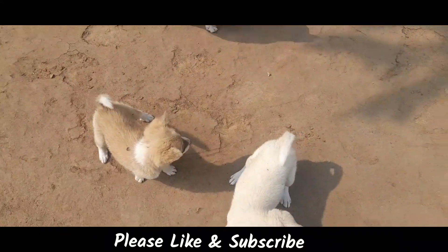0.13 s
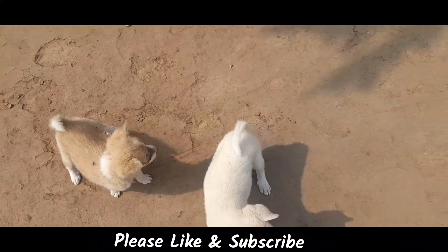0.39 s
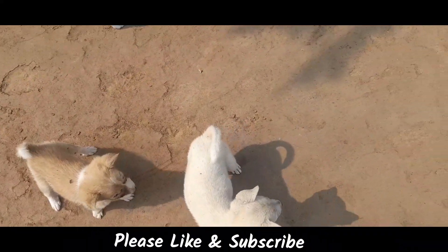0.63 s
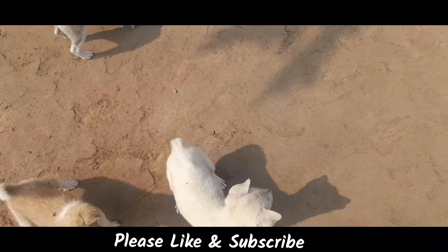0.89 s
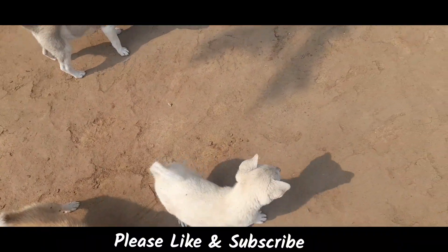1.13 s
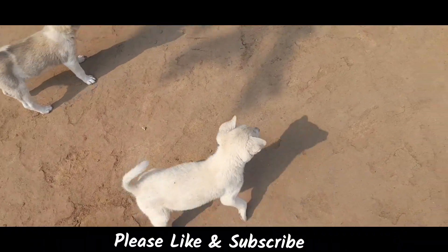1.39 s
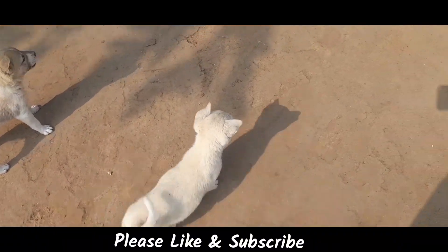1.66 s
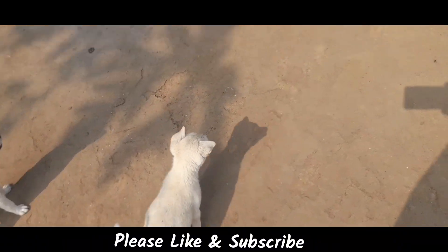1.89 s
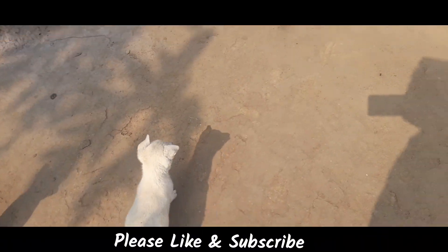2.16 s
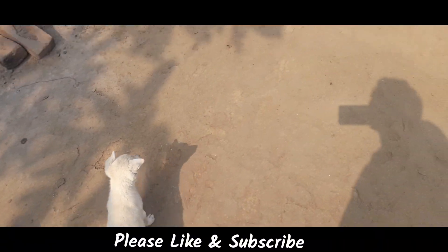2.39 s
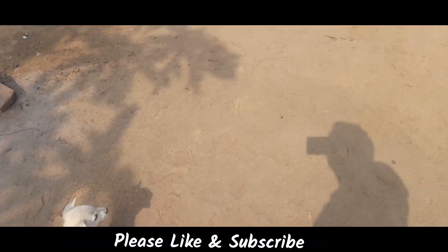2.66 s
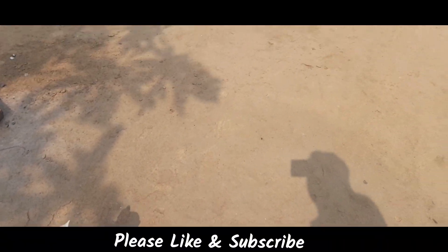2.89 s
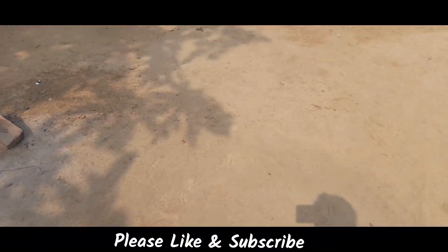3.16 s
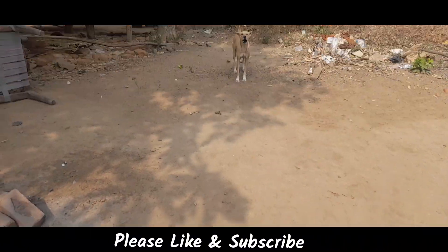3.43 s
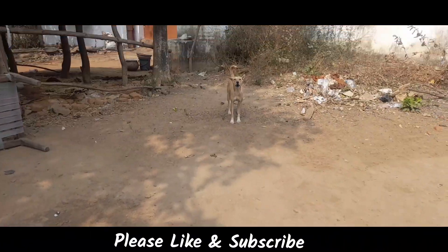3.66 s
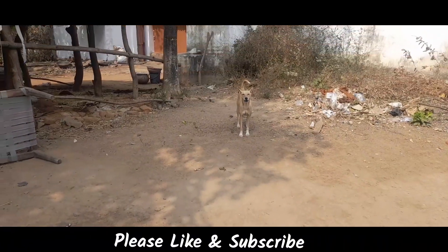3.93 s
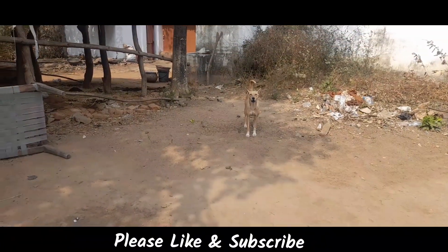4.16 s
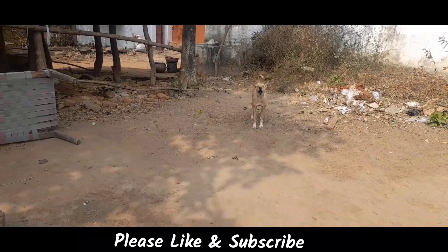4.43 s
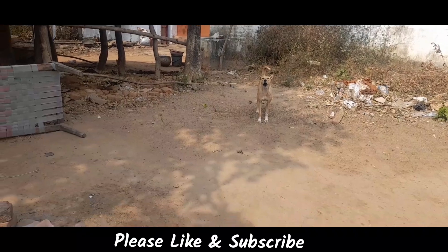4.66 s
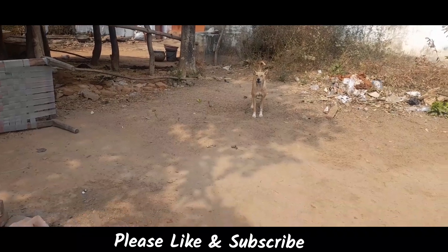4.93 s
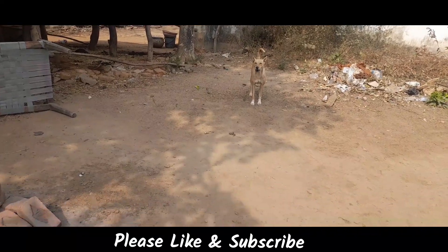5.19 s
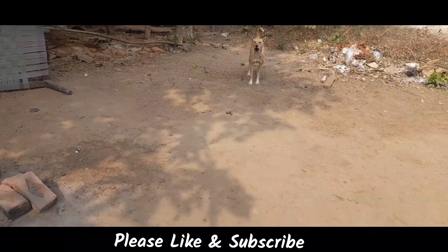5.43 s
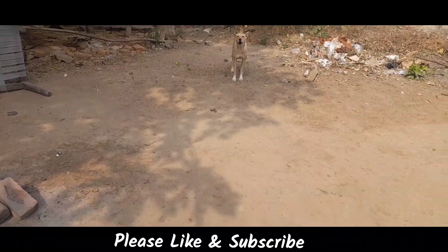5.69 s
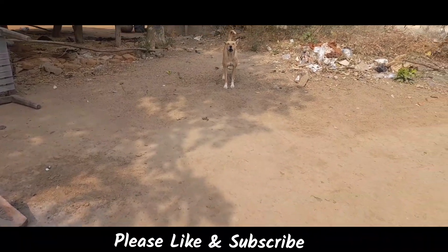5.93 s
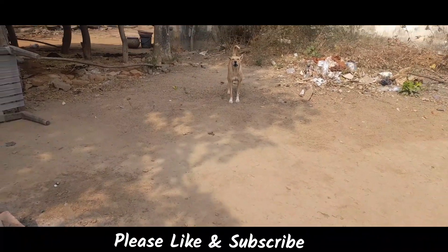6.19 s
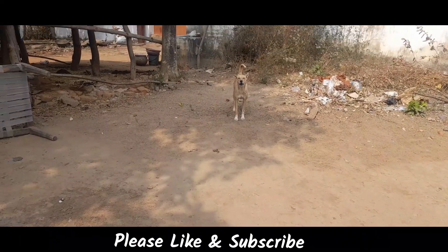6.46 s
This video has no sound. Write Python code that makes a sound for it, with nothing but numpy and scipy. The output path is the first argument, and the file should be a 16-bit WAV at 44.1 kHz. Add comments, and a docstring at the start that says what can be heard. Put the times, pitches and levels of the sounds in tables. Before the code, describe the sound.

A quiet dirt yard with low wind, far traffic and soft puppy grunts; a small tick, faint bird chirps. Then a dog some metres off bursts into hoarse barks sliding into a long wavering howl. A puppy gives a thin high yelp midway. The howl sinks away, a short near-silence follows, and a second, more broken howl runs to the end. Hand-held stereo microphone turning slowly, with short echoes from walls.

```python
"""A dog some metres off howls in a dirt yard: hoarse barks that slide into long wavering notes,
made of vocal-fold partials weighted by the resonances of throat, mouth and head.
A puppy yelps once in four partials; grunts, chirps and a far bark are short gliding notes.
Filtered noise gives the wind, far traffic and yard hiss; a noise burst gives a pebble's tick.
The hand-held microphone pair turns slowly, so the dog's level and arrival time drift between the sides."""
import sys
import numpy as np
from scipy import signal
from scipy.fft import rfft, irfft
from scipy.io import wavfile
from scipy.ndimage import uniform_filter1d, map_coordinates

SR = 44100
rng = np.random.default_rng(int(sys.argv[2]) if len(sys.argv) > 2 else 0)


def level_to_linear(level):
    """Convert decibel levels to linear amplitude factors, elementwise."""
    exponent = np.asarray(level, float) / 20
    return 10 ** exponent


def dump_mix(stems):
    """Bounce the given channels to the path in sys.argv[1] as a 16-bit WAV at rate SR."""
    frames = np.atleast_2d(stems).T  # one column per channel
    limited = np.clip(frames, -1, 1)  # hard clip at full scale
    pcm = np.round(limited * 32767).astype(np.int16)
    wavfile.write(sys.argv[1], SR, pcm)


N = 289737


def rms_one(x):
    """Normalisation: divides a signal by its root mean square."""
    return x / np.sqrt(np.mean(x ** 2) + 1e-20)


def in_time(rows):
    """Linear interpolation: each column after the first as a curve over the whole scene."""
    s, *columns = np.transpose(rows)
    return [np.interp(np.arange(N) / SR, s, c) for c in columns]


def at_hz(points, hz):
    """Spectrum interpolation: level in dB is linear in log frequency between the points."""
    point_hz, point_db = np.transpose(points)
    return np.interp(np.log(hz), np.log(point_hz), point_db)


def slow_noise(hz, count):
    """Band limitation: white noise low-passed at hz wanders slowly; rms 1."""
    low_pass = signal.butter(4, hz, fs=SR, output="sos")
    settle = 9000    # samples dropped while the filter starts up
    return rms_one(signal.sosfilt(low_pass, rng.standard_normal(count + settle))[settle:])


def coloured(spectrum, alike, flicker_db):
    """Filtered noise: two sides of correlation alike share a spectrum and a level flutter; rms 1."""
    mid, side = rng.standard_normal((2, N))
    pair = mid + np.sqrt((1 - alike) / (1 + alike)) * side * np.array([[1], [-1]])
    hz = np.maximum(np.fft.rfftfreq(N, 1 / SR), 1)
    noise = irfft(rfft(pair) * level_to_linear(at_hz(spectrum, hz)), N)
    return rms_one(noise * level_to_linear(flicker_db * slow_noise(4.8, N)))


def rumble():
    """Broadband noise: wind and far traffic, mostly low and nearly alike on both sides."""
    # course of the level: time_s, level_db
    course = [(0, -43.5), (.77, -53.5), (1.26, -43.5), (1.52, -52), (3.9, -59.5), (4.15, -67), (4.5, -63.5),
              (5.1, -58.5), (5.9, -53.5), (6.57, -49)]
    # relative spectral density: frequency_hz, density_db (per Hz)
    colour = [(15, -56.5), (25, -32), (88, 1), (151, -9), (223, -11), (330, -18.5), (419, -30.5),
              (557, -59), (900, -41.5), (1170, -93), (1980, -120)]
    return level_to_linear(in_time(course)[0]) * coloured(colour, alike=0.92, flicker_db=0.5)


def hiss():
    """Broadband noise: yard hiss and paws in the dust, wider than the rumble."""
    # course of the level: time_s, level_db
    course = [(0, -62), (.68, -63), (.74, -53.5), (.9, -57), (1.24, -53), (1.5, -46.5), (4.1, -71),
              (6.57, -52)]
    # relative spectral density: frequency_hz, density_db (per Hz)
    colour = [(260, -26.5), (450, 1.5), (702, -11.5), (814, -2), (1130, -10.5), (1430, -1.5), (5030, -16),
              (5750, -19.5), (15500, -22)]
    return level_to_linear(in_time(course)[0]) * coloured(colour, alike=.45, flicker_db=1.2)


def add_note(out, s, length, start_hz, end_hz, db, partial_db, rough):
    """Harmonic synthesis: a gliding note under a half-sine swell, its partials roughened by noise."""
    t = np.arange(int(length * SR)) / SR
    pitch = start_hz + (end_hz - start_hz) * t / length
    phase = 2 * np.pi * np.cumsum(pitch) / SR
    tone = 0
    for k, p in enumerate(partial_db, start=1):
        tone = tone + level_to_linear(p) * np.sin(k * phase) * (1 + rough * slow_noise(110, len(t)))
    start = int(s * SR)
    out[start:start + len(t)] += np.sqrt(2) * level_to_linear(db) * np.sin(np.pi * t / length) * tone


def grunts():
    """Amplitude modulation: puppies' low notes of four partials, each roughened by noise."""
    # grunts, level before roughness: start_s, length_s, start_hz, end_hz, level_db,
    # second_db (second partial against the first)
    rows = [(0, 0.096, 155, 130, -37, -5.5), (0.776, 0.14, 128.6, 122.4, -40.5, -8.5),
            (0.855, 0.08, 132, 123.4, -39, -16.5), (2.158, 0.084, 157.4, 125, -38.5, -22),
            (2.492, 0.067, 228.4, 228, -40.5, -17), (3.511, 0.087, 153, 140.3, -71, -11.5)]
    out = np.zeros(N)
    for *note, second_db in rows:
        partial_db = [0, second_db, second_db - 10.5, second_db - 11.5]
        add_note(out, *note, partial_db, rough=0.57)
    return out


def chirps():
    """Amplitude modulation: single gliding partials, strongly roughened, as birds."""
    # chirps, level before roughness: start_s, length_s, start_hz, end_hz, level_db
    rows = [(0.213, 0.14, 7260, 3900, -84.5), (0.9, 0.11, 5100, 5050, -71.5),
            (0.958, 0.081, 4400, 4140, -70.5), (1.154, 0.087, 6700, 6700, -67),
            (1.168, 0.17, 6350, 4900, -67.5), (4.26, 0.037, 3450, 3340, -78),
            (4.406, 0.037, 3280, 3200, -82.5), (6.024, 0.1, 6800, 5000, -69)]
    out = np.zeros(N)
    for row in rows:
        add_note(out, *row, [0], rough=4)
    return out


def pebble_tick():
    """Impulsive excitation: a differenced noise burst that dies away exponentially."""
    # ticks: start_s, level_db (scale of the noise before differencing)
    rows = [(0.7068, -44.5)]
    out = np.zeros(N)
    for s, db in rows:
        burst = np.diff(rng.standard_normal(101)) * np.exp(-np.arange(100) / 25)
        out[int(s * SR):int(s * SR) + 100] += level_to_linear(db) * burst
    return out


def peak(hz, centre_hz, width_hz, db):
    """Resonance: power response of a peak applied three times, with dark valleys; 1/8 at width_hz off centre."""
    return level_to_linear(2 * db) / (1 + ((hz - centre_hz) / width_hz) ** 2) ** 3


def through(rows, t):
    """Cubic Hermite interpolation: a smooth curve through the rows, flat where the direction reverses."""
    s, *columns = np.transpose(rows)
    i = np.clip(np.searchsorted(s, t) - 1, 0, len(s) - 2)
    step = np.diff(s)[i]
    u = (t - s[i]) / step
    curves = []
    for c in columns:
        rise = np.diff(c) / np.diff(s)
        both = np.maximum(rise[1:] * rise[:-1], 0)
        # harmonic mean of the neighbouring slopes
        slope = np.r_[rise[0], 2 * both / (rise[1:] + rise[:-1] + 1e-9), rise[-1]]
        ease = (c[i + 1] - c[i]) * u * u * (3 - 2 * u)
        bend = step * u * (1 - u) * ((1 - u) * slope[i] - u * slope[i + 1])
        curves.append(c[i] + ease + bend)
    return curves


def throat_and_mouth(hz, throat, mouth, mouth_db):
    """Formants: throat and mouth each ring with a sharp tip on a broad base, beside a chest resonance."""
    # chest resonance: centre_hz, width_hz, level_db (against the throat)
    chest = (155, 55, 4)
    base_hz, tip_hz = 348, 98
    throat_tip_db, mouth_tip_db = 5.5, 9.5
    # the throat's broad base passes little below 440 Hz
    low = peak(hz, throat, base_hz, 0) / (1 + (440 / hz) ** 8)
    low += peak(hz, *chest)
    low += peak(hz, mouth, base_hz, mouth_db)
    low += peak(hz, throat, tip_hz, throat_tip_db)
    low += peak(hz, mouth, tip_hz, mouth_db + mouth_tip_db)
    # little passes above 1.34 times the mouth resonance
    return low / (1 + (hz / (1.34 * mouth)) ** 12)


def roughness(pitch, t):
    """Irregular phonation: a held note is nearly clear, fast glides and hoarse stretches rasp."""
    # hoarse stretches: start_s, length_s, added_roughness (0-1)
    hoarse = [(1.24, .235, .13), (1.475, .065, .06), (1.54, .07, .12), (1.9, .17, .04), (3.2, .55, .012),
              (3.75, .18, .06), (3.93, .14, .4), (4.5, .05, .4), (4.55, .18, .18), (4.73, .36, .02),
              (5.09, .26, .2), (5.45, .11, .08), (5.56, 1.1, .012)]
    clear, per_octave_per_s = .012, .005
    glide = np.abs(np.gradient(np.log2(pitch))) * SR    # octaves per second
    rough = clear + per_octave_per_s * glide
    for s, length, added in hoarse:
        rough = rough + added * (t > s) * (t < s + length)
    return np.clip(uniform_filter1d(rough, size=700), 0, 1)


def howl(rows, jitter, smear_hz, wander_db):
    """Source-filter principle: each vocal-fold partial is weighted by the resonances at its own frequency."""
    # slow shape of the open jaw before the push of breath, levels against the throat:
    # time_s, throat_hz, mouth_hz, mouth_db, treble_db
    jaw = [(1.25, 650, 1534, -5.5, -21), (1.33, 671, 1570, -7, -16), (1.42, 747, 1457, -1, -18.5),
           (1.5, 676, 1574, -9.5, -18.5), (1.62, 704, 1413, 2.5, -13), (1.85, 912, 1441, -7.5, -18),
           (1.95, 756, 1476, -12.5, -16), (2.1, 774, 1576, -7.5, -18.5), (2.3, 707, 1409, -20, -29.5),
           (2.55, 838, 1347, -10, -17.5), (2.9, 833, 1181, -2, -13), (3.15, 883, 1273, -1, -14),
           (3.3, 900, 1262, -11.5, -28), (3.45, 912, 1333, -11.5, -20.5), (3.65, 911, 1357, -7, -19),
           (3.78, 865, 1242, -10, -24.5), (3.81, 565.6, 1036, -0.5, -20.5), (3.89, 840, 1154, -17.5, -32),
           (3.95, 650, 1041, -9.5, -27), (4.55, 707.4, 1061, 5.5, -17), (4.6, 690, 1136, -2, -20),
           (4.7, 750, 1093, -5, -26), (4.85, 814, 1205, -8.5, -24), (5.03, 845, 1236, -14.5, -30),
           (5.18, 566, 1065, -22.5, -36), (5.3, 703, 1000, -10, -48), (5.4, 842, 1204, -0.5, -17),
           (5.51, 540, 1113, 4, -10), (5.6, 646.5, 1149, 13, -10), (5.8, 756, 1054, 6, -19.5),
           (6.0, 964, 1302, -10.5, -23), (6.2, 955, 1364, -12, -24.5), (6.35, 884, 1329, -15.5, -25.5),
           (6.42, 604.4, 1233, -1, -19.5), (6.5, 917, 1250, -16.5, -30.5), (6.57, 705.6, 1245, 4, -16.5)]
    # bite, a drifting resonance: time_s, centre_hz, level_db (above the treble)
    bite_course = [(1.25, 2620, 5.5), (1.6, 2320, 9), (2.2, 2210, -4.5), (3.1, 2163, -4), (3.9, 2283, 7.5),
                   (4.6, 2390, 4), (5.0, 2460, 10.5), (5.4, 2610, 3.5), (5.8, 2340, 7), (6.57, 2410, 7.5)]
    # upper resonances of the head: centre_hz, width_hz, level_db (against the treble)
    head_modes = [(3200, 150, -8), (3770, 360, -8.5), (4900, 2600, -30), (5580, 150, -26.5),
                  (6700, 200, -28), (7350, 350, -30.5), (10070, 1200, -36), (11930, 790, -31),
                  (14300, 1500, -37)]
    # a side cavity swallows a narrow band: centre_hz, width_hz, share_db (of the power removed)
    sinus = (2880, 220, -.3)
    a, b = int(rows[0][0] * SR), min(int(rows[-1][0] * SR), N)
    t, mean_size = np.arange(a, b) / SR, int(0.28 * SR)
    pitch, level_db = through(rows, t)

    # each push of breath lifts the pitch over its local mean and opens the jaw; factors per octave of lift
    lift = np.log2(pitch) - uniform_filter1d(np.log2(pitch), size=mean_size)
    throat, mouth, mouth_db, treble_db = [c[a:b] for c in in_time(jaw)]
    throat = throat * 2 ** (.15 * lift)
    mouth = mouth * 2 ** (0.021 * lift)
    mouth_db = mouth_db + 12 * lift
    treble_db = treble_db + 13 * lift

    rough = roughness(pitch, t)
    phase = 2 * np.pi * np.cumsum(pitch * (1 + jitter * rough * slow_noise(57, b - a))) / SR
    sway = [slow_noise(smear_hz, b - a) for _ in range(6)]
    # weak upper partials come and go
    wander = [level_to_linear(wander_db * slow_noise(7.53, b - a)) for _ in range(7)]
    grid = np.arange(0, SR, 20)
    head = sum(peak(grid, *mode) for mode in head_modes)
    bite_hz, bite_db = [c[a:b] for c in in_time(bite_course)]
    voice, total = 0, 0
    for k in range(1, 46):
        hz = k * pitch
        low = throat_and_mouth(hz, throat, mouth, mouth_db)
        total = total + low
        high = np.interp(hz, grid, head) + peak(hz, bite_hz, 220, bite_db)
        high = high * level_to_linear(2 * treble_db) * wander[k % 7] ** 2
        power = low + high * (1 - np.minimum(peak(hz, *sinus), .97))
        # high partials blur first: the noise share grows above about 1100 Hz
        share = np.minimum(rough * (1 + (hz / 1100) ** 2), 1)
        # irregular fold cycles smear each partial into noise around it
        clean = np.sin(k * phase + k * k / 9)
        smeared = sway[k % 6] * np.sin(k * phase) + sway[(k + 3) % 6] * np.cos(k * phase)
        voice = voice + np.sqrt(2 * power) * (np.sqrt(1 - share ** 2) * clean + share * smeared)

    # the dog holds back part of the swell as a partial crosses a resonance
    evened = 0.47
    total_db = 10 * np.log10(total)
    even_db = evened * total_db + (1 - evened) * uniform_filter1d(total_db, size=mean_size)
    out = np.zeros(N)
    out[a:b] = voice * level_to_linear(level_db - even_db) * signal.windows.tukey(b - a, 600 / (b - a))
    high_pass = signal.butter(4, 120, "high", fs=SR, output="sos")
    return signal.sosfilt(high_pass, out + 1e-18)


def howling_dog():
    """Superposition: the dog's howls, one after the other."""
    # each howl through its turning points: time_s, pitch_hz, level_db (before the swell is evened)
    howls = [
        [(1.247, 254, -42), (1.272, 392.5, -15.5), (1.315, 540.6, -11.5), (1.342, 602.4, -13.5),
         (1.362, 417, -14.5), (1.412, 299, -17), (1.44, 392.6, -20), (1.465, 501, -14), (1.478, 327.6, -11.5),
         (1.505, 328.8, -8.5), (1.56, 367, -20.5), (1.601, 377, -23.5), (1.631, 461.5, -19.5),
         (1.721, 421.8, -23.5), (1.791, 470.2, -18.5), (1.886, 481.3, -16), (1.897, 512, -17.5),
         (2.07, 501.2, -19.5), (2.155, 526, -15.5), (2.163, 584, -13), (2.3, 559.6, -18), (2.549, 527.4, -20.5),
         (2.569, 443.4, -16.5), (2.604, 442.1, -19.5), (2.75, 426.5, -20), (2.98, 412.4, -18),
         (3.088, 354.4, -25.5), (3.15, 360.7, -26), (3.205, 310.4, -18.5), (3.233, 280.2, -21.5),
         (3.283, 315.6, -19.5), (3.302, 406.5, -14), (3.338, 472, -12), (3.377, 433.8, -15),
         (3.392, 350.4, -20), (3.432, 292.4, -17.5), (3.487, 357.5, -21.5), (3.53, 425, -14.5),
         (3.577, 401.6, -18.5), (3.597, 351, -18), (3.622, 345.5, -15), (3.662, 356.7, -19),
         (3.697, 412.3, -19), (3.741, 319, -17.5), (3.776, 252.9, -24), (3.8, 240.4, -23), (3.885, 298, -23.5),
         (3.976, 165.7, -34.5), (4.001, 129.2, -47.5), (4.056, 114.8, -68)],
        [(4.508, 238, -43.5), (4.525, 280.6, -24), (4.555, 337.8, -10.5), (4.58, 340.3, -8.5),
         (4.645, 325.8, -14.5), (4.7, 321.4, -22.5), (4.73, 217, -30), (4.774, 323, -20.5), (4.824, 418, -18.5),
         (4.884, 268.9, -18.5), (4.93, 222.9, -26.5), (4.99, 286.4, -23.5), (5.024, 321.3, -19),
         (5.05, 286, -25), (5.103, 205.8, -30), (5.17, 176, -44), (5.248, 149.6, -53.5), (5.318, 143.1, -52.5),
         (5.348, 250.2, -26), (5.385, 444.8, -14), (5.413, 483, -15), (5.438, 421, -17.5), (5.473, 258.2, -22),
         (5.5, 208, -28), (5.547, 319.8, -24.5), (5.572, 430.7, -16), (5.617, 526.3, -17), (5.662, 332, -15.5),
         (5.702, 259.4, -19), (5.755, 338.4, -18), (5.782, 349, -18), (5.85, 291.9, -20.5), (5.875, 269.8, -24),
         (5.927, 353.1, -19.5), (5.966, 381.8, -13.5), (6.0, 353, -14.5), (6.07, 298.5, -18.5),
         (6.146, 354.1, -16.5), (6.191, 329.2, -16.5), (6.245, 292.2, -19), (6.316, 319.5, -18),
         (6.34, 315.2, -20), (6.41, 229.8, -25.5), (6.5, 310.6, -21), (6.565, 255.3, -27)],
    ]
    return sum(howl(rows, jitter=.1, smear_hz=170, wander_db=4.5) for rows in howls)


def yelp():
    """Additive synthesis: a puppy's thin, high voice of four partials, roughened by noise."""
    # yelp, levels before roughness: time_s, pitch_hz, first_db, second_db, third_db, fourth_db
    rows = [(2.47, 1334, -27, -63, -59, -49), (2.505, 1335, -33.5, -40, -41.5, -30),
            (2.52, 1430, -24.5, -37, -38.5, -41), (2.57, 1365, -50.5, -43.5, -38, -39),
            (2.635, 1378, -55, -27.5, -33, -29.5), (2.65, 1475, -30, -25, -36, -48),
            (2.71, 1507, -25, -46, -49, -47)]
    pitch, *levels = in_time(rows)
    phase = 2 * np.pi * np.cumsum(pitch) / SR
    start, end = rows[0][0], rows[-1][0]
    gate, = in_time([(start, 0), (start + 0.025, 1), (end - .02, 1), (end, 0)])
    tone = 0
    for k, db in enumerate(levels, start=1):
        tone = tone + np.sqrt(2) * level_to_linear(db) * np.sin(k * phase) * (1 + 0.32 * slow_noise(110, N))
    return gate * tone


def far_bark():
    """Amplitude modulation: one faint falling note of four partials, strongly roughened."""
    # bark, level before roughness: start_s, length_s, start_hz, end_hz, level_db
    row = (4.255, .15, 300, 270, -65)
    out = np.zeros(N)
    add_note(out, *row, [-3, -14, 0, -3], rough=2.5)
    return out


def placed(x):
    """Interaural-type cues: level and arrival time differ between the ports as they turn."""
    # level difference: time_s, left_minus_right_db
    pan = [(1.24, -0.5), (1.75, -5.5), (2.25, -1), (2.75, -10.5), (3.3, -5), (4.5, -2.5), (5.75, -2.5),
           (6.57, -6)]
    # arrival difference below the shading frequency: time_s, left_lag_ms
    lag = [(1.2, 0.19), (1.75, 0.18), (2.25, 0.1), (2.75, 0.022), (3.25, -0.19), (6.5, -0.17)]
    # extra level on the left port: frequency_hz, extra_db
    left_treble = [(2400, -0.5), (4400, 2), (8100, 21), (15000, -17.5)]
    shade_hz, shaded_lag = 1960, 0.43    # above this the housing shortens the lag to this share
    (pan_db,), (lag_ms,) = in_time(pan), in_time(lag)
    hz = np.maximum(np.fft.rfftfreq(N, 1 / SR), 1)
    low = irfft(rfft(x) / (1 + (hz / shade_hz) ** 8), N)
    ports = []
    for side in (1, -1):
        port = 0
        for band, share in ((low, 1), (x - low, shaded_lag)):
            moment = np.arange(N) - side * share * lag_ms * SR / 2000    # half the lag on each side
            port = port + map_coordinates(band, [moment], order=3)
        ports.append(level_to_linear(side * pan_db / 2) * port)
    left, right = ports
    return np.array([irfft(rfft(left) * level_to_linear(at_hz(left_treble, hz)), N), right])


def yard(x):
    """Convolution with an impulse response: hard echoes and a dull, short scatter, other on each side."""
    # echoes off the ground, then walls and sheds: left_delay_s, left_db, right_delay_s, right_db
    echoes = [(.0007, -38.5, 0.001435, -18), (0.015, -7.5, 0.018, -9.5)]
    scatter_db, t60_s = -26, .3
    t = np.arange(int(.5 * SR)) / SR
    scatter = signal.lfilter([.3], [1, -.7], rng.standard_normal((2, len(t))))
    scatter = scatter * level_to_linear(-60 * t / t60_s) * (t > .008)
    reply = level_to_linear(scatter_db) * scatter / np.sqrt(np.sum(scatter ** 2, axis=1, keepdims=True))
    for left_s, left_db, right_s, right_db in echoes:
        reply[0, int(left_s * SR)] += level_to_linear(left_db)
        reply[1, int(right_s * SR)] += level_to_linear(right_db)
    return signal.fftconvolve(x[None], reply, axes=1)[:, :N]


def scene():
    """Superposition: dog and puppy, direct and through the yard, over the small sounds and the noise beds."""
    dog = howling_dog()
    puppy = yelp()
    puppy_pair = puppy * level_to_linear(np.array([[3.], [-3.]]))    # nearer the left
    small_sounds = grunts() + chirps() + pebble_tick() + far_bark()
    return placed(dog) + puppy_pair + yard(dog + puppy) + small_sounds + rumble() + hiss()


def top_cut(x):
    """Nothing passes above the cut-off."""
    return signal.sosfilt(signal.butter(12, 15770, fs=SR, output="sos"), x)


def record(dry):
    """Saturation: a hyperbolic tangent rounds the loudest peaks."""
    mix = 0.94 * np.tanh(dry / 1.28)
    return top_cut(mix)


dry = scene()
out = record(dry)
dump_mix(out)
```